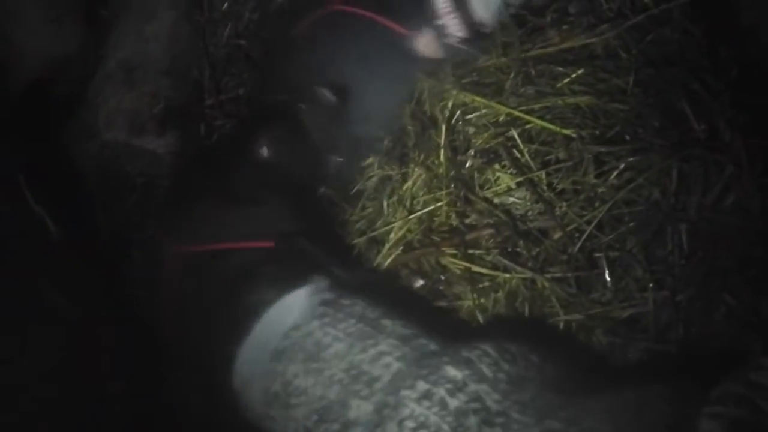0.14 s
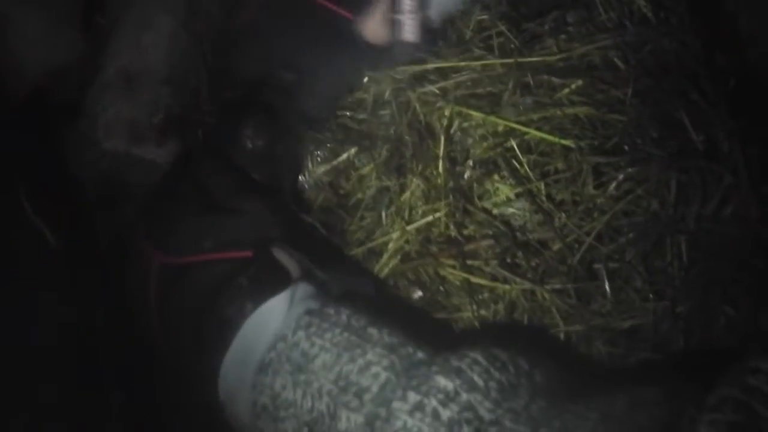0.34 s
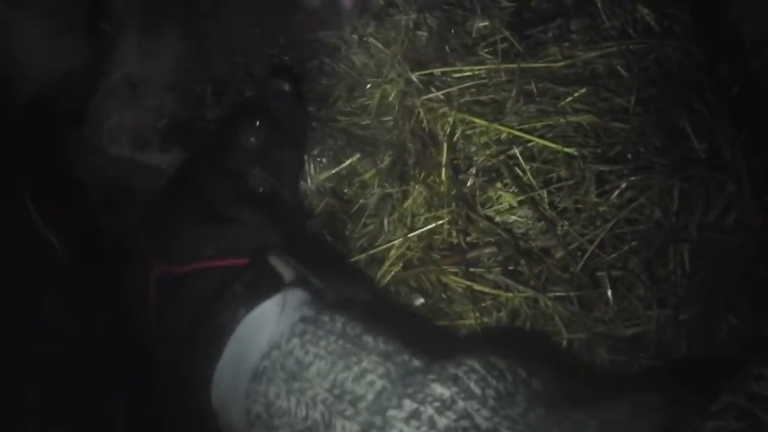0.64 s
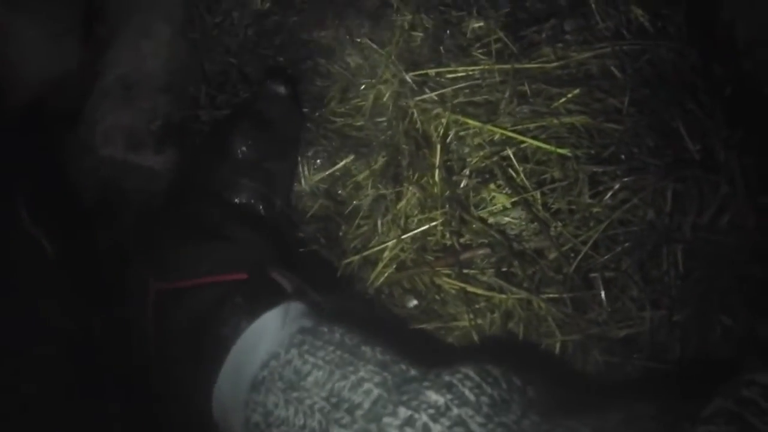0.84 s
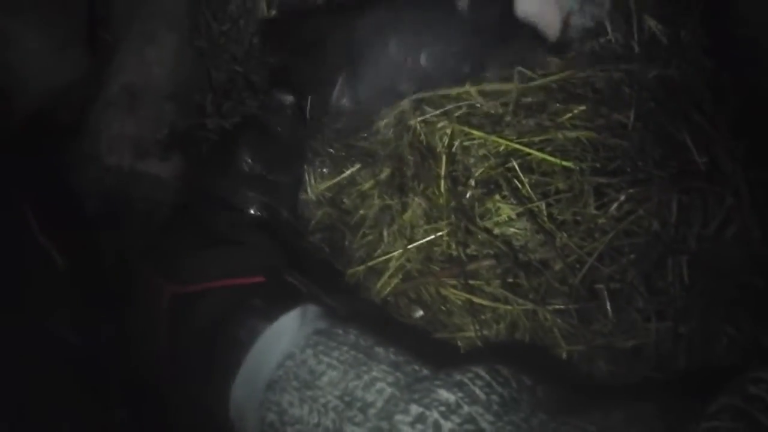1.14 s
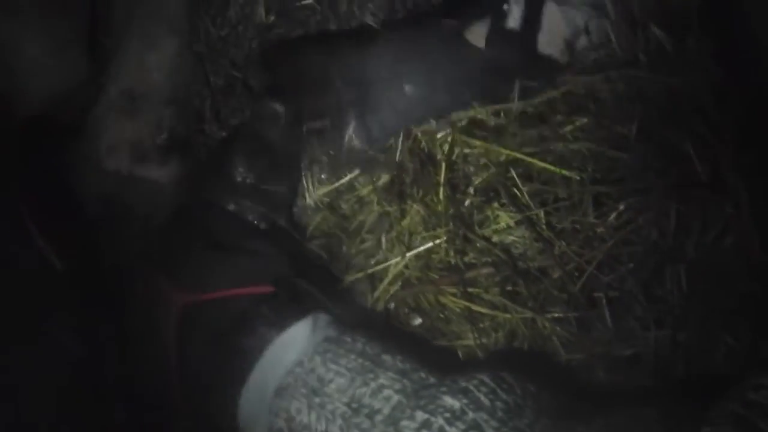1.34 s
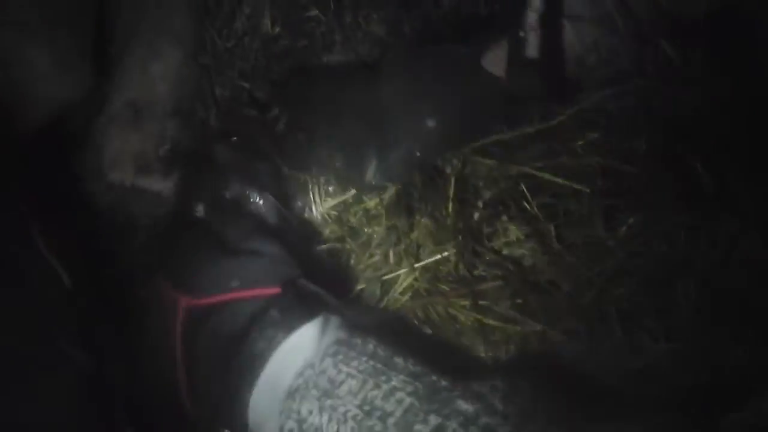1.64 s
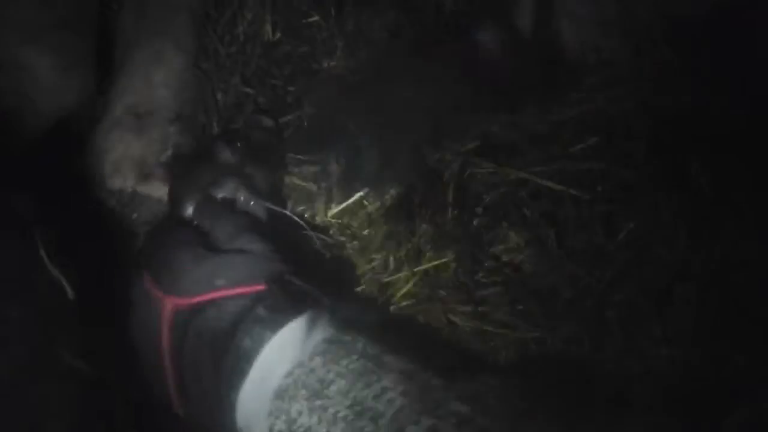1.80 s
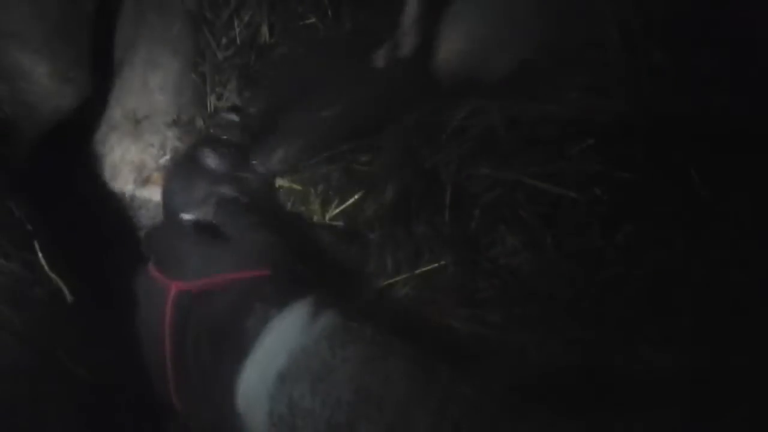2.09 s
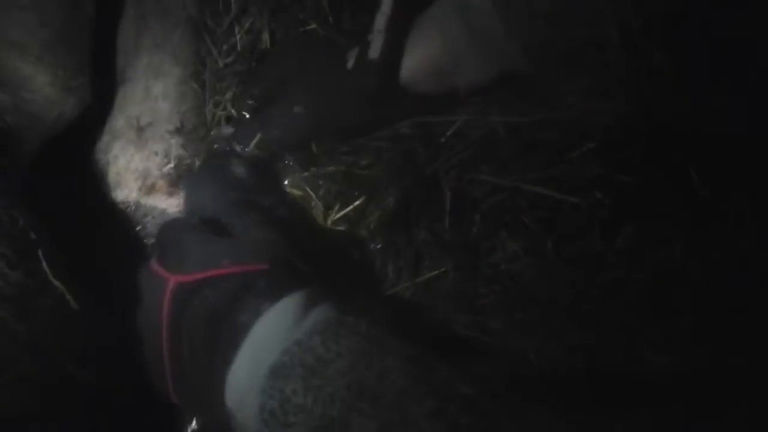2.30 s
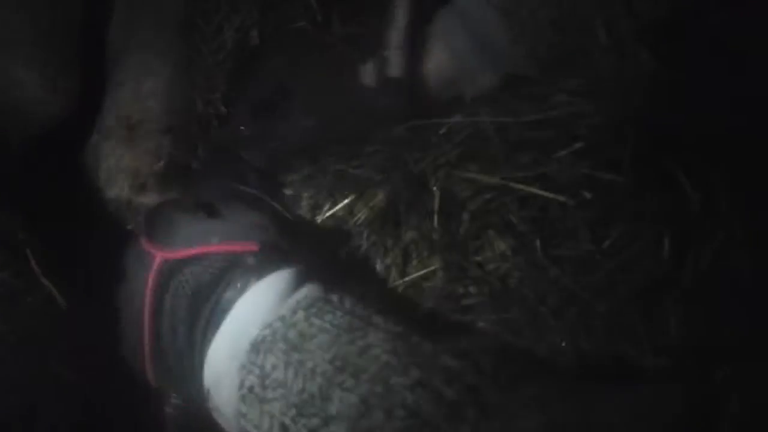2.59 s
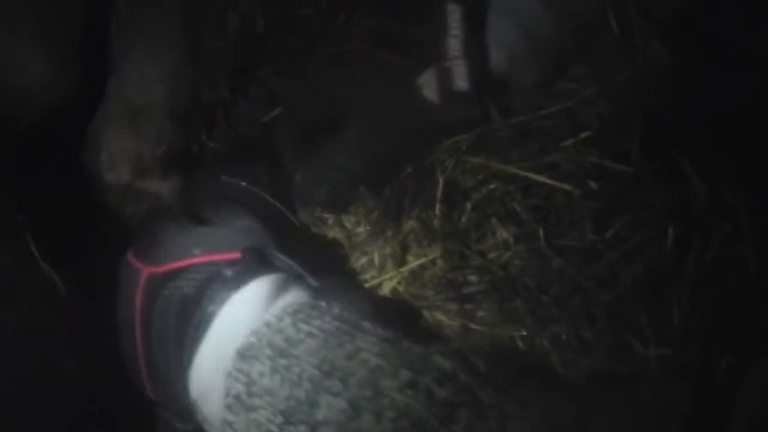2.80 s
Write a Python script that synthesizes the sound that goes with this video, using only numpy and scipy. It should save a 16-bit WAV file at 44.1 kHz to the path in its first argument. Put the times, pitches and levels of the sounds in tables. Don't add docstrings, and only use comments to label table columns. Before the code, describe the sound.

Close, throaty pig grunts, three in all, with nasal snuffles and crackling hay in a quiet barn

```python
import sys
import numpy as np
from scipy import signal
from scipy.io import wavfile
from scipy.ndimage import uniform_filter1d

SR = 44100
rng = np.random.default_rng(int(sys.argv[2]) if len(sys.argv) > 2 else 0)


def materialize(psi):
    bounded = np.clip(np.atleast_2d(psi).T, -1, 1)
    quanta = np.round(bounded * 32767).astype(np.int16)
    wavfile.write(sys.argv[1], SR, quanta)


def invert_db(level):
    return 10 ** (np.asarray(level, dtype=float) / 20)


N = 130095

# f/Hz, level/dB
HUSH_COLOUR = [(25, -1), (92, -0.5), (271, -16), (405, -1.5), (600, -19.5), (1150, -16), (3000, -21.5),
               (4500, -47)]
HUSH_DB = -54
# f/Hz, likeness (1 = same)
LIKENESS = [(30, 0.93), (500, 0.6), (1500, 0.84), (3000, 0.84), (8000, 0.62), (9500, 0.73), (11000, 0.6)]
# t/s, level/dB
RUSTLE_LEVEL = [(0, -52.5), (.3, -52), (.45, -49.5), (.76, -47.5), (1.102, -53), (1.5, -53.5), (1.7, -53),
                (1.82, -48), (2.14, -50), (2.42, -54), (2.62, -51.5), (2.75, -48.5), (2.95, -49.5)]
TICKS_PER_S, TICK_SPREAD_DB, TICKS_DB = 1700, 3.5, -4
# t/s, peak level/dB, noise body level/dB, left minus right/dB
STRAW_SNAPS = [(0.219, -8, -17.5, -2.5), (0.2277, -25, -3.5, 0), (0.615, -22.5, -27, -0.5),
               (0.6346, -27, -11.5, 1.5), (1.032, -40, -10, 5.5), (1.3313, -27, -35, 0),
               (1.3405, -16.5, -15.5, -0.5), (1.3527, -14, -12, -3), (1.364, -29.5, -33, 0.5),
               (1.7472, -41, 11.5, 1.5), (1.786, -54.5, 9, 1), (1.9962, -16, -17, -1),
               (2.0062, -20, -15, -0.5), (2.109, -41, -20, -11)]
# start t/s, length/s, level/dB, ticks per second
STRAW_SCRAPES = [
    (0, .05, -40, 500),
    (1.279, .024, -34, 310),
    (2.107, .006, -28, 400),
]
# t/s, peak level/dB, f/Hz
BODY_THUMPS = [(1.25, -42, 200), (1.44, -36, 60), (1.81, -40, 120), (2.64, -34, 55), (2.706, -36, 110),
               (2.495, -43, 110)]

# start t/s, length/s, level/dB, nostril f/Hz, hiss level/dB
SNUFFLES = [(0.558, 0.26, -52.5, 930, -7), (0.861, 0.069, -47.5, 414, -24), (1.18, 0.12, -46, 525, -8),
            (1.562, 0.066, -40.5, 458, -17), (1.597, 0.072, -35.5, 470, -10),
            (1.758, 0.24, -51.5, 926, -23), (1.879, 0.072, -38, 481, -5), (1.956, 0.11, -55.5, 860, 6),
            (2.181, 0.16, -55.5, 440, 22.5), (2.261, 0.096, -35.5, 441, -13),
            (2.316, 0.092, -52.5, 457, -16), (2.408, 0.077, -47, 563, -8), (2.72, 0.26, -51.5, 922, 3.5)]
# f/Hz, level/dB
SNOUT_COLOUR = [(300, -38), (420, 0), (750, -5), (1350, -14), (1950, -11), (2600, -17), (4200, -15),
                (5500, -32)]
NOSTRIL_WIDTH_HZ, FLUTTER_HZ, FLUTTER_DB = 83, 62.4, 1.5
# start t/s, length/s, level/dB, from f/Hz, to f/Hz
NOSE_WHISTLES = [(0, 0.035, -48, 5250, 4600), (.87, 0.09, -44.5, 413, 504), (1.207, 0.11, -53, 4700, 4200),
                 (1.278, 0.019, -41, 4180, 3650), (1.271, 0.022, -51, 4450, 4250),
                 (1.275, 0.024, -47, 1350, 1200), (1.598, .07, -40, 11620, 11350),
                 (1.596, 0.064, -48, 1900, 1870), (1.597, 0.062, -39, 630, 563),
                 (1.882, 0.085, -44, 1910, 2050), (1.91, 0.054, -39, 796, 884),
                 (2.024, 0.04, -50, 1740, 1750), (2.274, 0.066, -59, 1270, 1150),
                 (2.297, 0.033, -38.5, 600, 536), (2.43, 0.062, -47.5, 1770, 2130),
                 (2.441, 0.03, -50.5, 3840, 4200), (2.451, 0.03, -61, 500, 690),
                 (0.397, 0.034, -40.5, 1920, 1910), (0.438, 0.025, -37, 1770, 1850),
                 (2.583, 0.058, -33.5, 2050, 1670), (2.578, .03, -44.5, 2900, 2750)]
# start t/s, length/s, level/dB, from f/Hz, to f/Hz
CHEST_HUMS = [(.394, 0.044, -29, 187, 181), (0.457, 0.063, -31, 108, 98), (0.527, 0.039, -34.5, 162, 164),
              (.57, 0.016, -36, 160, 157), (1.241, 0.039, -38.5, 391, 530), (1.278, 0.031, -39.5, 968, 805),
              (1.278, 0.036, -49.5, 1960, 1790), (1.368, 0.053, -31, 188, 191),
              (1.429, 0.023, -31.5, 148, 178), (2.318, 0.044, -35.5, 463, 410),
              (2.359, 0.062, -56, 426, 450), (2.58, 0.042, -27.5, 197, 193),
              (2.632, 0.046, -30, 158.5, 153)]
HUM_WAVER = 0.034

# t/s, effort level/dB, mouth opening level/dB
GRUNT_EFFORTS = [
    [(.393, -14.5, 2), (.408, -22, -10), (.42, -29, -9), (.435, -24.5, 2.5), (.47, -23, -2.5),
     (.5, -32.5, 3), (.515, -39, 5.5), (.54, -34, -0.5), (.64, -68, 7)],
    [(1.365, -21, -8.5), (1.381, -26, -7.5), (1.417, -23.5, 0), (1.455, -32.5, 7), (1.49, -72, 7),
     (1.52, -59, 2)],
    [(2.578, -20, -4), (2.615, -27, 5.5), (2.63, -23.5, -1), (2.645, -23, -1), (2.67, -38, -6),
     (2.69, -65, -10), (2.71, -30, -9), (2.75, -53, -17)],
]
# pitch hold/s, chest level/dB, deep level/dB, darkening/dB per octave
GRUNT_BUILDS = [
    (.04, -6.5, -1.5, -2),
    (0.047, -9.5, -5.5, -5),
    (.035, -7.5, -4.5, -6),
]
FOLD_HZ, CREAK_HZ, SAG_S = 203, 62, .035
JITTER, SHIMMER_DB, WEAK_DB = .12, 1, -6.5
PUFF_DB, STEADY_AIR = 4.5, 0.29
CHEST_HZ, CHEST_END_HZ, CHEST_WIDTH_HZ, DEEP_HZ = 198, 158, 55, 100
# f/Hz, width/Hz, level/dB
THROAT_RESONANCES = [(417.7, 115, 0.5), (565.6, 27, -3), (615, 105, -0.5), (730, 130, 4), (1044, 53, -6),
                     (1300, 110, -11), (1550, 49, -11.5), (1797, 940, -4), (3540, 490, -5.5),
                     (4490, 620, -5)]
BREATHY_HZ = 1200
# t/s, peak level/dB
PALATE_FLAPS = [(.3935, -17.5), (.4025, -17), (.430, -5.5), (1.185, -39), (1.216, -32.5), (1.383, -20.5),
                (1.388, -37), (1.392, -15.5), (1.407, -13.5), (1.412, -20), (1.766, -34), (2.579, -16.5),
                (2.5875, -15.5), (2.5985, -36), (2.609, -22), (2.613, -11)]
# f/Hz, level/dB
CHEST_THROAT_DIP = [(225, 0), (265, -9), (330, -9), (385, 0)]

PEN_DB, PEN_T60_S, SIDE_DB = -8, 0.27, -55
# f/Hz, level/dB
PORT_DIFFERENCE = [(1500, -46.5), (4000, -16), (8500, -2.5), (11500, -10)]
# f/Hz, level/dB
PORT_LEAN = [(1500, 0.5), (4000, 0), (8500, 2), (11500, -0.5)]
# f/Hz, level/dB
MIC_COLOUR = [(6500, -0.5), (7700, 1.5), (8500, 7), (10000, -11), (11500, 2), (12050, -2), (12300, -42),
              (14000, -67)]
NOTCH_HZ, NOTCH_WIDTH_HZ = 7850, 350
GAP_FROM_HZ, WEAK_HZ, GAP_SHARE, GAP_DB = 2500, 10000, .14, -40


def evened(x):
    return x / np.sqrt(np.mean(x ** 2) + 1e-20)


def read(points, hz):
    f, value = np.transpose(points)
    return np.interp(np.log(hz + 1), np.log(f + 1), value)


def add(mix, s, sound):
    part = mix[round(s * SR):][:len(sound)]
    part += sound[:len(part)]


def noise(count):
    return rng.standard_normal(SR // 2)[:count]


def wander(count, hz):
    white = rng.standard_normal(N) if count == N else noise(SR)
    slow = signal.lfilter(*signal.butter(2, hz, fs=SR), white)
    return evened(slow[-count:])


def arch(length, lean):
    return np.sin(np.pi * np.linspace(0, 1, round(length * SR)) ** lean)


def resonate(x, hz, width):
    turn = np.exp(2j * np.pi * np.cumsum(hz * np.ones(len(x))) / SR)
    r = np.exp(-np.pi * width / SR)
    slow = signal.lfilter([1 - r], [1, -r], x / turn + 1e-18)
    return 2 * (turn * slow).real


def colour(x, points):
    log_gain = np.log(invert_db(read(points, abs(np.fft.fftfreq(8192, 1 / SR)))))
    taps = np.fft.ifft(np.exp(np.conj(signal.hilbert(log_gain)))).real[:4096]
    return signal.oaconvolve(np.atleast_2d(x), taps[None])[:, :x.shape[-1]].reshape(x.shape)


def spread(points, patchy_db):
    frames, hz = N // 256 + 5, np.fft.rfftfreq(1024, 1 / SR)
    a, b, c, d, patches = rng.standard_normal((frames, 513, 5)).T
    patches = uniform_filter1d(patches, size=14, axis=0)
    patches = evened(uniform_filter1d(patches, size=10, axis=1))
    same = np.clip(read(LIKENESS, hz), -1, 1)[:, None]
    left = a + 1j * b
    right = same * left + np.sqrt(1 - same ** 2) * (c + 1j * d)
    z = np.array([left, right]) * invert_db(read(points, hz)[:, None] + patchy_db * patches)
    return evened(signal.istft(z, nperseg=1024, noverlap=768)[1][:, :N])


def hush():
    return invert_db(HUSH_DB + 2 * wander(N, 4.4)) * spread(HUSH_COLOUR, patchy_db=3)


def bedding():
    s, level_db = np.transpose(RUSTLE_LEVEL)
    shade = [(300, -2), (700, 0.5), (1800, -2), (4000, 0.5), (9000, 1.0)]
    happens = rng.random((3, N)) < TICKS_PER_S / SR
    ticks = invert_db(TICK_SPREAD_DB * rng.exponential(1, (3, N))) * happens
    ticks = colour(ticks * rng.choice([-1, 1], (3, N)), shade)
    fizz = spread(shade, patchy_db=3.5) + invert_db(TICKS_DB) * evened(ticks[0] + 2.16 * ticks[1:])
    level = invert_db(np.interp(np.arange(N) / SR, s, level_db) + 4.5 + wander(N, 8.6))
    return level * fizz


def scrapes():
    out = np.zeros((2, N))
    shade = [(2500, -49), (4100, 23), (5500, -22), (9000, 17.0), (11500, 23.5)]
    for s, length, db, rate in STRAW_SCRAPES:
        t = np.arange(0, length, 1 / SR)
        slips = 0.087 + np.exp(-(t * rate % 1) / 0.11)
        sound = colour(invert_db(db) * slips * np.exp(-t / length) * noise(len(t)), shade)
        for c in range(2):
            add(out[c], s, sound)
    return out


def snaps():
    out, t = np.zeros((2, N)), np.arange(400) / SR
    for s, db, body_db, pan_db in STRAW_SNAPS:
        burst = rng.standard_normal((3, 400)) * np.exp(-t / 0.00074)
        burst = colour(burst, [(1500, -13.5), (3000, 8.5)])
        for c in range(2):
            ring = np.sin(2 * np.pi * 8600 * t + 0.25 * c) * np.exp(-((t - .0008) / 0.00033) ** 2)
            twin = np.sin(2 * np.pi * 11500 * t) * np.exp(-((t - .0008) / 0.00041) ** 2)
            body = invert_db(body_db + 2.5) * (burst[0] + 0.32 * burst[c + 1])
            side = invert_db(db - 3.5 + pan_db * (3.0 - c))
            add(out[c], s, side * (ring + 0.1 * twin + body))
    return out


def thumps():
    out, t = np.zeros(N), np.arange(3000) / SR
    for s, db, hz in BODY_THUMPS:
        swell = t / 0.0036 * np.exp(1 - t / 0.004)
        add(out, s, invert_db(db) * np.sin(2 * np.pi * hz * t) * swell)
    return out


def whistles():
    out = np.zeros(N)
    for s, length, db, from_hz, to_hz in NOSE_WHISTLES:
        shape = arch(length, 0.66)
        hz = np.linspace(from_hz, to_hz, len(shape))
        tone = resonate(noise(len(hz)), hz, 40 + from_hz / 30)
        tone = resonate(tone, hz, 170 + from_hz / 40)
        add(out, s, invert_db(db) * shape * evened(tone))
    return out


def hums():
    out = np.zeros(N)
    for s, length, db, from_hz, to_hz in CHEST_HUMS:
        shape = arch(length, 0.61) ** 0.36
        hz = np.linspace(from_hz, to_hz, len(shape)) * (1 + HUM_WAVER * wander(len(shape), 82))
        add(out, s, invert_db(db + 2) * shape * np.sin(2 * np.pi * np.cumsum(hz) / SR))
    return out


def snuffles():
    out = np.zeros(N)
    for s, length, level_db, nostril_hz, hiss_db in SNUFFLES:
        shape = arch(length, 0.82) ** 0.72
        air = noise(len(shape)) * invert_db(FLUTTER_DB * wander(len(shape), FLUTTER_HZ))
        hum = resonate(air, nostril_hz, NOSTRIL_WIDTH_HZ * (nostril_hz / 440) ** 3)
        hum = resonate(hum, nostril_hz, .5 * nostril_hz)
        hiss = colour(air, SNOUT_COLOUR)
        top = colour(noise(len(shape)), [(2500, -52), (4000, 9.5), (5500, 2), (7000, 12), (11500, 9)])
        breath = 1.035 * evened(hum) + evened(hiss) + invert_db(hiss_db) * shape * evened(top)
        add(out, s, invert_db(level_db) * shape * breath)
    return out


def throat(pulses, air, tilt_db=0):
    out = 0
    for k, (hz, width, db) in enumerate(THROAT_RESONANCES):
        source = pulses if hz < BREATHY_HZ else air
        tilt = tilt_db * np.log2(min(hz, BREATHY_HZ) / 650)
        ring = resonate(resonate(source, hz, width), hz, 4 * width)
        out = out + (-1) ** k * invert_db(db + tilt) * 80 / width * ring
    return out


def flaps():
    out, t = np.zeros(N), np.arange(3000) / SR
    click = 1. * (t == 0)
    flap = colour(throat(click, invert_db(-16) * click), [(480, -23.5), (780, -9)])
    flap = flap * np.exp(-t / 0.0045)
    for s, db in PALATE_FLAPS:
        add(out, s, invert_db(db) * flap / abs(flap).max())
    return out


def grunt(rows, hold_s, chest_db, deep_db, tilt_db):
    s, effort_db, mouth_db = np.transpose(rows)
    t = np.arange(0, s[-1] - s[0] + 0.047, 1 / SR)
    sag = 1 - np.exp(-np.maximum(t - hold_s, 0) / SAG_S)

    pitch = (FOLD_HZ + (CREAK_HZ - FOLD_HZ) * sag) * (1 + JITTER * wander(len(t), 90))
    turns = .99 + np.cumsum(pitch) / SR
    cycle = turns.astype(int)
    size = invert_db(WEAK_DB * (cycle % 2) + SHIMMER_DB * rng.standard_normal(200)[cycle])
    folds = evened(np.diff(cycle, prepend=0) * size)

    gusts = STEADY_AIR * noise(len(t))
    puffs = evened(size * np.exp(-(turns % 1) / 0.5) * noise(len(t)))
    air = invert_db(9.0) * evened(0.9 * puffs + gusts) * np.minimum(t / 0.031, 1) * invert_db(-6 * sag)

    chest_hz = CHEST_HZ + (CHEST_END_HZ - CHEST_HZ) * sag
    chest = evened(resonate(resonate(folds, chest_hz, CHEST_WIDTH_HZ), chest_hz, 90))
    deep = evened(resonate(resonate(folds, DEEP_HZ, 74), DEEP_HZ, 130))
    low = invert_db(chest_db + 2.5 * wander(len(t), 4.9)) * chest + invert_db(deep_db) * (0.63 + sag) * deep
    low = invert_db(-8.5) * colour(low, [(205, 1), (260, -13.0)])

    tilt = tilt_db * (2 * np.minimum(t / 0.047, 1) - 1)
    high = throat(folds + invert_db(PUFF_DB) * puffs, air, tilt)
    high = evened(colour(high, [(300, -15.5), (400, -22.5)]))
    high = invert_db(np.interp(t + s[0], s, mouth_db) - 1.0 - 5.2 * sag) * high

    level = invert_db(np.interp(t + s[0], s, effort_db)) * (t < s[-1] - s[0])
    return level * (low + high) * np.minimum(t / 0.0023, 1)


def grunts():
    out = np.zeros(N)
    for rows, build in zip(GRUNT_EFFORTS, GRUNT_BUILDS):
        add(out, rows[0][0], grunt(rows, *build))
    return out


def pig():
    voice = colour(grunts() + flaps(), CHEST_THROAT_DIP)
    return voice + snuffles() + whistles() + hums() + thumps()


def scene():
    t = np.arange(SR // 3) / SR
    taps = rng.standard_normal((3, len(t))) * invert_db(-60 * t / PEN_T60_S) * (t > .004)
    taps = taps[0] + invert_db(SIDE_DB - 7.0) * taps[1:]
    voice = pig()
    pen = signal.fftconvolve(voice[None], taps / np.linalg.norm(taps[0]), axes=1)[:, :N]
    early = taps[0, :800] / np.linalg.norm(taps[0, :800])
    apart = colour(signal.fftconvolve(voice, early)[:N], PORT_DIFFERENCE)
    close = voice + np.outer([1, -1], apart)
    return close + invert_db(PEN_DB) * pen + snaps() + scrapes() + bedding() + hush()


def low_pass(x):
    return signal.sosfilt(signal.butter(12, 13370, fs=SR, output="sos"), x)


def record(dry):
    x = colour(np.array([colour(dry[0], PORT_LEAN), dry[1]]), MIC_COLOUR)
    x = signal.lfilter(*signal.iirnotch(NOTCH_HZ, NOTCH_HZ / NOTCH_WIDTH_HZ, SR), x)
    hz, t, z = signal.stft(x, SR, nperseg=1024, noverlap=768)
    luck = rng.random((len(t) // 8 + 1, len(hz) // 6 + 1)).T
    luck = luck.repeat(6, axis=0).repeat(8, axis=1)[:len(hz), :len(t)]
    hz = hz[:, None]
    near_notch = abs(hz - NOTCH_HZ) < 150
    near_weak = abs(hz - WEAK_HZ) < 750
    chance = GAP_SHARE * (1 + 5 * near_notch + 1.2 * near_weak)
    gaps = (luck < chance) & (hz > GAP_FROM_HZ)
    x = signal.istft(z * invert_db(GAP_DB * gaps), SR, nperseg=1024, noverlap=768)[1][:, :N]
    return low_pass(x)


dry = scene()
out = record(dry)
materialize(out)
```